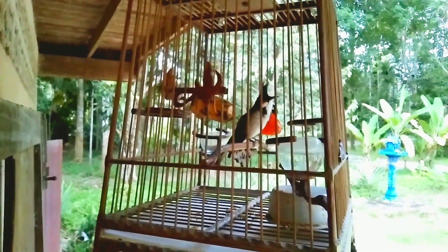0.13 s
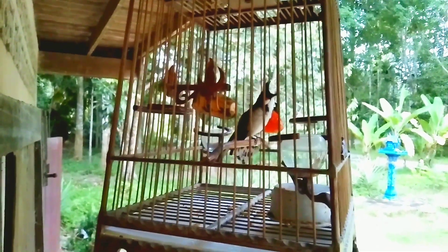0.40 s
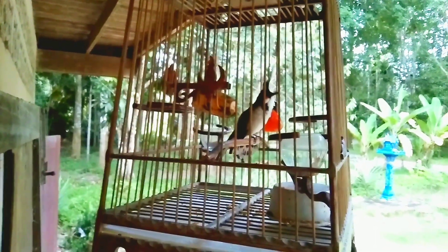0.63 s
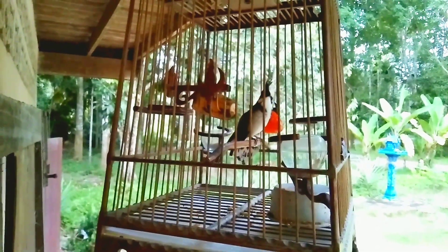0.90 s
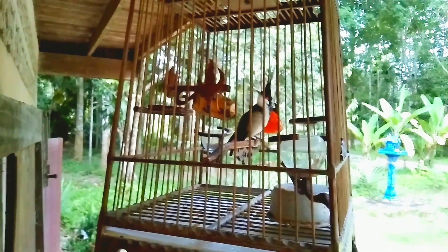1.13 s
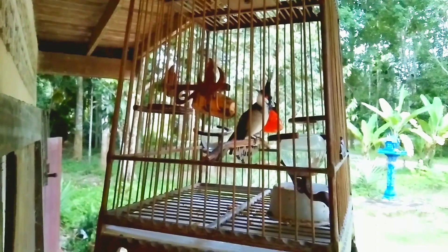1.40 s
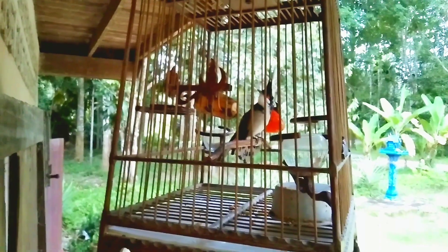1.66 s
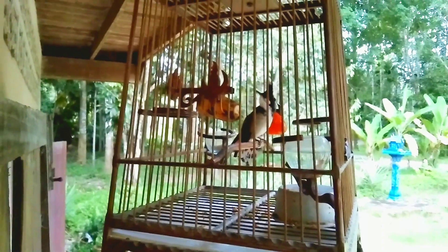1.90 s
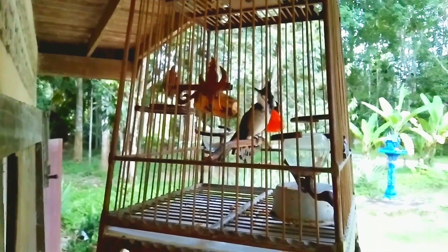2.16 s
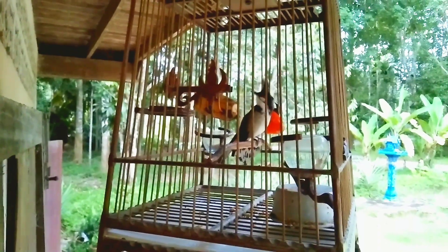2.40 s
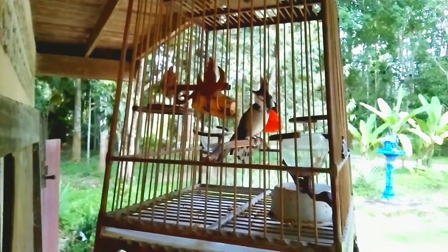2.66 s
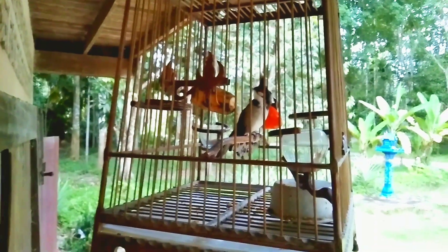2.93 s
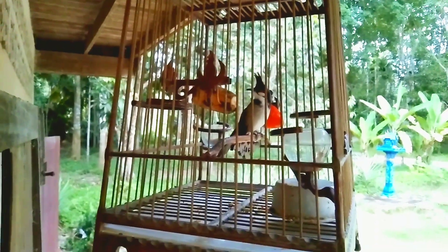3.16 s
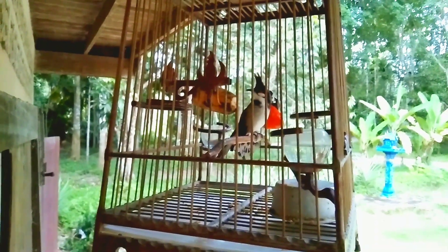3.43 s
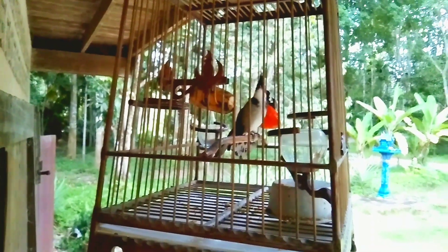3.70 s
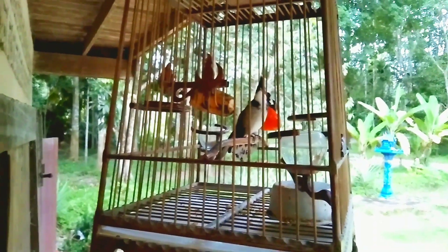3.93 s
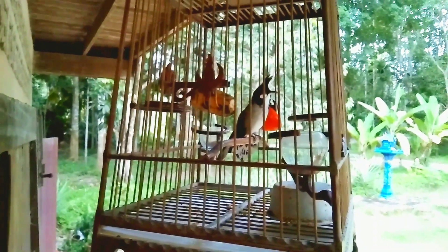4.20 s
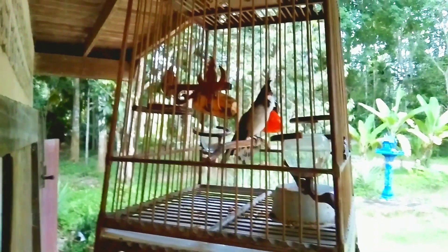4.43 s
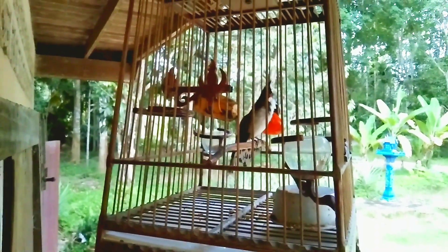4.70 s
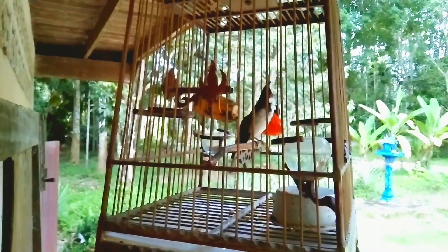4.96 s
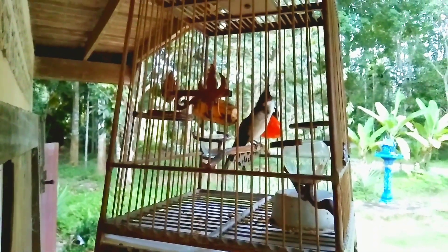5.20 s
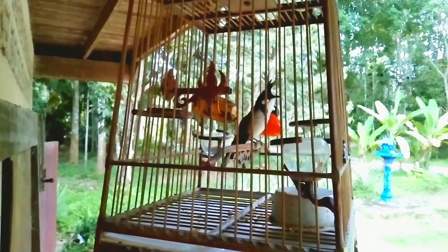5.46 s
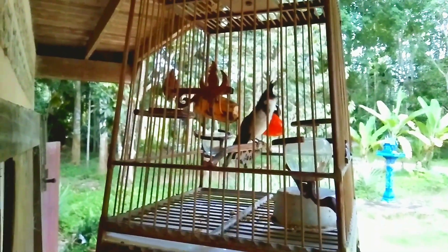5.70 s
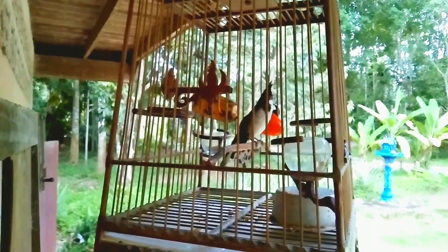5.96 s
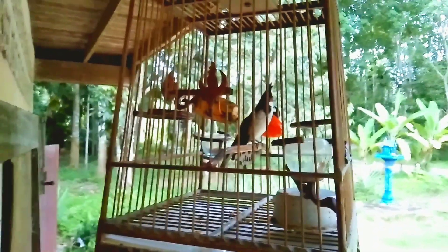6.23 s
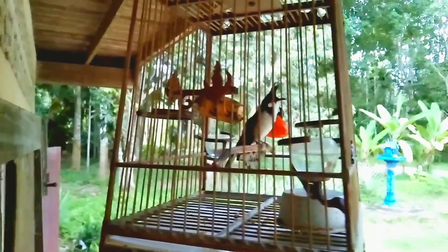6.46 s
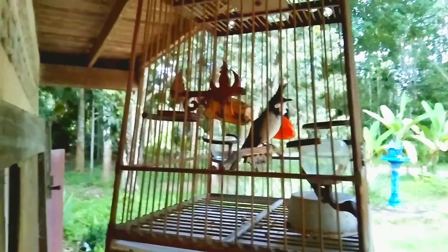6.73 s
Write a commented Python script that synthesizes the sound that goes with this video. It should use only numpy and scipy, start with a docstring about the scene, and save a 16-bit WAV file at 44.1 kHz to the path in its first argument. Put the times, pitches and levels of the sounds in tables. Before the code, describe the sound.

Outdoors beside a wooden-roofed porch, a brief echoing tail of birdsong fades into faint twitters among trees, soft throbbing dove coos, thin insect buzzes and light garden hiss. Past the middle, a caged bulbul close to the microphone bursts into a loud, quick phrase of liquid gliding whistles lasting about a second. Its echo rings in the trees, then the quiet background returns.

```python
"""Bulbuls under a roof and among trees

One bulbul under a wooden roof whistles a loud bubbly phrase close by: gliding tones, overtones, early echoes.
Gliding tones among the trees, from other bulbuls and high chirps, are heard mostly through noise-built echo.
Doves coo in throbbing low tones; insects buzz in swells of narrow noise beaten by wing strokes.
Shaped noise makes a low rumble, a faint rustle and steady air; very faint low tones make a patchy floor."""
import sys
import numpy as np
from scipy import signal
from scipy.fft import rfft, irfft, next_fast_len
from scipy.io import wavfile
from scipy.ndimage import uniform_filter1d, map_coordinates

SR = 44100
rng = np.random.default_rng(int(sys.argv[2]) if len(sys.argv) > 2 else 0)


def log_audio(samples):
    """Write samples as a 16-bit WAV file to the path given in sys.argv[1]."""
    # one column per channel
    frames = np.atleast_2d(samples).T
    # limit to full scale, then quantise
    limited = np.clip(frames, -1, 1)
    pcm = np.round(limited * 32767).astype(np.int16)
    wavfile.write(sys.argv[1], SR, pcm)


def boost(x):
    """Linear amplitude factor 10**(x/20) for a level x in decibels (scalar or array-like)."""
    u = np.asarray(x, float) / 20
    return 10 ** u


N = 302085
LEAD = SR // 4  # samples a track starts early


def unit(x):
    """Scaled to rms 1."""
    return x / np.sqrt(np.mean(x ** 2) + 1e-20)


def along(points, hz):
    """(frequency [Hz], value) points read on a log frequency axis."""
    f, v = np.transpose(points)
    return np.interp(np.log(hz + 1), np.log(f + 1), v)


def wobble(rate_hz, size=N):
    """A smooth random curve, rate_hz knots a second."""
    knots = rng.standard_normal(int(size * rate_hz / SR) + 4)
    return map_coordinates(knots, [np.arange(size) * rate_hz / SR])


def noise(gain_db):
    """Noise of rms 1 coloured by a dB function of frequency."""
    m = next_fast_len(N)
    spectrum = rfft(rng.standard_normal(m)) * boost(gain_db(np.fft.rfftfreq(m, 1 / SR)))
    return unit(irfft(spectrum, m)[:N])


def resonance(centre_hz, width_hz):
    """Noise of rms 1 in one narrow band."""
    return noise(lambda hz: np.maximum(-4 * ((hz - centre_hz) / width_hz) ** 2, -120))


def since(s):
    """Seconds after each given moment, a row for each."""
    return np.arange(N) / SR - np.asarray(s)[:, None]


def add(track, s, sound):
    """Mixes a sound into a track that starts LEAD samples early."""
    part = track[round(s * SR) + LEAD:][:len(sound)]
    part += sound[:len(part)]


# echo among the trunks: (frequency [Hz], t60 [s])
TREE_T60 = [(600, 0.33), (2000, 0.53), (4000, 0.36), (9000, 0.29)]


def echo(rise_s, patchy_db=1.0):
    """A fresh tail of energy 1; each frequency dies at its own speed, in clumps, as trunks stand unevenly."""
    hz, t, z = signal.stft(rng.standard_normal(SR * 3 // 5), SR, nperseg=256)
    clumps = uniform_filter1d(rng.standard_normal(z.shape), size=5, axis=0)
    clumps = unit(uniform_filter1d(clumps, size=3, axis=1))
    decay_db = -60 * t / along(TREE_T60, hz)[:, None]
    build = 1 - np.exp(-t / rise_s)
    tail = signal.istft(z * boost(patchy_db * clumps + decay_db) * build, SR, nperseg=256)[1]
    return tail / np.linalg.norm(tail)


# air rushing through a throat: (frequency [Hz], relative density [dB])
BREATH_COLOUR = [(4000, -64.5), (5000, -9), (7500, 1), (9000, -4.5), (12000, -20), (15500, -31.5)]


def breath(size):
    """A short stretch of throat noise of rms 1."""
    gain = boost(along(BREATH_COLOUR, np.fft.rfftfreq(size, 1 / SR)))
    return unit(irfft(rfft(rng.standard_normal(size)) * gain, size))


# loud bass at the start, soon falling; then low thumps: (time [s], peak level [dB])
BASS_PEAKS = [(.02, -45.5), (.2, -49), (.61, -59.5), (1.03, -60.5), (1.35, -56), (1.56, -56), (2.02, -63),
              (2.22, -63), (2.63, -58.5), (2.92, -55), (3.199, -65.5), (3.5, -65), (3.83, -60.5),
              (4.2, -59), (5.45, -68), (5.98, -65), (6.319, -59)]
# rumble colour: (frequency [Hz], relative density [dB])
RUMBLE_COLOUR = [(12, -57.5), (20, -17.5), (32, -24), (75, -5.5), (118, -4.5), (137, -7), (178, -16.5),
                 (220, -27), (290, -58), (480, -120)]
STEADY_DB, PEAK_RISE_DB_PER_S, PEAK_FALL_DB_PER_S = -74, 199.5, 101


def rumble():
    """Lumpy low noise with a wavering narrow hum; bass peaks rise above a steady floor."""
    s, db = np.transpose(BASS_PEAKS)
    t = since(s)
    peaks_db = db[:, None] - np.maximum(-PEAK_RISE_DB_PER_S * t, PEAK_FALL_DB_PER_S * t)
    level_db = uniform_filter1d(np.maximum(peaks_db.max(axis=0), STEADY_DB), size=1500)
    hum = resonance(centre_hz=127, width_hz=6)
    body = noise(lambda hz: along(RUMBLE_COLOUR, hz)) + 0.44 * hum
    return boost(level_db) * unit(boost(0.77 * wobble(34)) * body)


# rustle colour: (frequency [Hz], relative density [dB])
RUSTLE_COLOUR = [(170, -30), (250, 9), (480, 2.5), (1000, -8.5), (1500, -36)]
# rustle loudness: (time [s], level [dB])
RUSTLE_LEVEL = [(0, -89), (.21, -80), (.4, -91), (1.05, -88), (2.6, -84.5), (3.34, -87.5), (3.7, -79),
                (4.2, -71), (4.37, -84), (6.2, -76), (6.35, -72), (6.85, -66.5)]


def rustle():
    """Faint flickering noise that comes and goes."""
    s, db = np.transpose(RUSTLE_LEVEL)
    flicker = boost(4.7 * wobble(25))
    return boost(np.interp(np.arange(N) / SR, s, db)) * unit(flicker * noise(lambda hz: along(RUSTLE_COLOUR, hz)))


# garden hiss with a far insect chorus near 4.6 kHz: (frequency [Hz], relative density [dB])
AIR_COLOUR = [(500, -32), (800, -2.5), (1200, -16.5), (1900, -8.5), (2400, -23), (3900, -19), (4300, -6.5),
              (4650, -3.5), (5000, -8.5), (5500, -22), (6000, -20), (9000, -25), (15400, -31),
              (16200, -56.5)]
AIR_DB = -80.5


def air():
    """Coloured noise, almost steady."""
    return boost(AIR_DB + 0.68 * wobble(4.2)) * noise(lambda hz: along(AIR_COLOUR, hz))


# overtones of a bird among the nearest trees: (multiple of the pitch, level [dB])
NEAR_TREE_OVERTONES = [(2, -29), (3, -33.5), (4, -58.5)]


def far_whistles(notes, direct_db=-10, dulling=0.97, bend=0.87, waver=.02, breath_db=-42):
    """Distant whistles arrive weak and direct, then mostly as echo from the trees."""
    track = np.zeros(N + LEAD)
    for s, length_s, start_hz, end_hz, db in notes:
        u = np.linspace(0, 1, round(length_s * SR))
        glide_hz = start_hz + (end_hz - start_hz) * u ** bend
        phase = 2 * np.pi * np.cumsum(glide_hz * (1 + waver * wobble(119.3, size=len(u)))) / SR
        loss_db = dulling * min(db + 26.0, 0)  # fainter means farther: air and leaves eat the overtones
        level = np.sqrt(2) * boost(db) * np.sin(np.pi * u)
        fundamental = np.sin(phase)
        overtones = sum(boost(k_db + loss_db) * np.sin(round(k) * phase) for k, k_db in NEAR_TREE_OVERTONES)
        throat = boost(breath_db + loss_db) * breath(len(u))
        # turned away: only the fundamental comes straight
        add(track, s, boost(direct_db) * level * fundamental)
        add(track, s, signal.fftconvolve(level * (fundamental + overtones + throat), echo(rise_s=0.0089)))
    return track[LEAD:]


# clearest gliding whistles among the trees, with the echo wash under the near phrase:
# (time [s], length [s], start pitch [Hz], end pitch [Hz], level into the echo [dB])
TREE_NOTES = [(-0.039, 0.022, 4210, 4035, -21), (-0.027, 0.043, 4140, 2903, -34),
              (-0.03, 0.035, 3100, 2033, -41.5), (-0.018, 0.022, 3730, 3734, -29),
              (0.11, 0.032, 3180, 4090, -41.5), (0.129, 0.011, 2630, 3240, -30.5),
              (0.108, 0.034, 1970, 2276, -42.5), (0.143, 0.03, 2046, 2905, -29.5),
              (0.201, 0.029, 2030, 2440, -31.5), (0.25, 0.016, 1120, 1030, -66),
              (0.4, 0.036, 1050, 1032, -67.5), (0.535, 0.018, 2740, 2080, -57.5),
              (0.548, 0.033, 2476, 4030, -48.5), (0.578, 0.019, 3690, 3540, -45),
              (0.685, 0.025, 2530, 2440, -65), (0.7, 0.024, 1600, 1540, -74),
              (0.709, 0.037, 2790, 2852, -49), (0.77, 0.032, 3110, 3340, -62.5),
              (0.793, 0.069, 3210, 2545, -55), (1.28, 0.041, 2880, 3120, -60),
              (1.3, 0.022, 1715, 3120, -53.5), (1.318, 0.02, 2900, 3800, -45),
              (1.345, 0.025, 4050, 3583, -43), (1.411, 0.081, 1830, 1910, -68),
              (1.553, 0.015, 1720, 2560, -46), (1.581, 0.012, 2670, 3125, -38.5),
              (1.675, 0.017, 2260, 2065, -47), (1.685, 0.018, 3030, 3720, -39.5),
              (1.795, 0.022, 2630, 3240, -42), (1.825, 0.019, 3260, 3800, -39.5),
              (1.806, 0.043, 3170, 3120, -48), (1.858, 0.042, 1470, 1398, -53),
              (1.89, 0.029, 2470, 2405, -44.5), (1.951, 0.037, 2390, 1396, -47.5),
              (2.02, 0.0086, 3260, 2480, -47.5), (2.074, 0.038, 1870, 3330, -52),
              (2.087, 0.028, 2120, 1883, -49.5), (2.124, 0.044, 3540, 2935, -47),
              (2.21, 0.014, 1220, 1230, -58.5), (2.26, 0.062, 2490, 2454, -44.5),
              (2.281, 0.011, 2850, 2010, -42.5), (2.35, 0.023, 2910, 2854, -42),
              (2.39, 0.03, 2900, 3690, -44), (2.471, 0.052, 1680, 1920, -53),
              (2.5, 0.02, 2100, 2210, -38.5), (2.536, 0.038, 3200, 2120, -46.5),
              (2.669, 0.019, 2150, 3390, -41), (2.696, 0.044, 1310, 1660, -63.5),
              (2.807, 0.042, 2310, 2270, -45), (2.815, 0.036, 2460, 3660, -48),
              (2.894, 0.0085, 2810, 2880, -45), (2.955, 0.029, 1790, 1887, -53),
              (3.009, 0.014, 3670, 3340, -56), (3.2, 0.06, 785, 1006, -67),
              (3.265, 0.055, 2100, 2264, -58.5), (3.33, 0.031, 2550, 2680, -51),
              (3.36, 0.013, 2767, 2516, -39), (3.39, 0.027, 2800, 3880, -59),
              (3.39, 0.053, 2340, 1230, -63), (3.475, 0.016, 3500, 2640, -53),
              (3.501, 0.072, 1390, 1182, -58.5), (3.526, 0.02, 2130, 1980, -55.5),
              (3.698, 0.025, 1640, 1740, -64.5), (3.72, 0.024, 1060, 1070, -63),
              (3.725, 0.079, 1190, 1331, -58.5), (3.732, 0.044, 2070, 3090, -48),
              (3.785, 0.021, 2910, 3290, -47.5), (3.849, 0.015, 1270, 1234, -54.5),
              (3.87, 0.026, 2150, 2133, -48), (3.934, 0.051, 1310, 1184, -61.5),
              (3.953, 0.042, 2820, 1750, -55.5), (4.02, 0.036, 1740, 1500, -65.5),
              (4.04, 0.028, 3130, 4000, -65.5), (4.28, 0.031, 1280, 1410, -68),
              (4.374, 0.012, 2300, 4210, -33.5), (4.385, 0.03, 3620, 4180, -31),
              (4.41, 0.03, 4100, 4290, -28.5), (4.53, 0.05, 3140, 3110, -37.5),
              (4.6, 0.034, 2220, 2090, -45), (4.549, 0.063, 2910, 1910, -31.5),
              (4.7, 0.053, 2016, 4250, -34), (4.77, 0.071, 4060, 2980, -24.5),
              (4.86, 0.033, 1870, 3400, -36.5), (4.87, 0.035, 3520, 3720, -29),
              (4.95, 0.073, 4128, 2292, -24.5), (5.03, 0.061, 1987, 3812, -27),
              (5.1, 0.041, 2800, 2650, -24.5), (5.06, 0.016, 1300, 1650, -53),
              (5.18, 0.017, 1790, 1840, -50.5), (5.25, 0.069, 1515, 1315, -63.5),
              (5.292, 0.021, 2600, 3340, -27.5), (5.317, 0.027, 4290, 2470, -26),
              (5.438, 0.015, 3770, 3230, -26.5), (5.471, 0.0088, 3780, 3580, -32),
              (5.478, 0.033, 2470, 3246, -22.5), (5.506, 0.013, 2380, 2615, -20.5),
              (5.45, 0.052, 1420, 1342, -69.5), (5.55, 0.027, 1720, 1605, -55.5),
              (5.595, 0.016, 2600, 2664, -24), (5.629, 0.051, 3280, 4170, -43.5),
              (5.66, 0.04, 3600, 3883, -43), (5.717, 0.055, 4300, 4100, -49),
              (5.78, 0.0058, 1477, 1720, -55), (5.798, 0.013, 3200, 1970, -47.5),
              (5.828, 0.012, 3630, 3640, -34.5), (5.84, 0.055, 2016, 1690, -63),
              (5.866, 0.029, 3110, 2940, -57), (6.05, 0.02, 1590, 1536, -68),
              (6.125, 0.046, 2880, 2780, -46.5), (6.163, 0.044, 2760, 1830, -53.5),
              (6.189, 0.012, 3400, 2770, -46.5), (6.244, 0.0096, 2020, 2005, -43.5),
              (6.327, 0.032, 2630, 3780, -44.5), (6.371, 0.057, 2250, 2940, -49),
              (6.454, 0.045, 2920, 3364, -43), (6.572, 0.037, 2750, 3380, -45),
              (6.6, 0.089, 2300, 1574, -54), (6.626, 0.028, 3660, 3040, -49),
              (6.65, 0.034, 3590, 3980, -57), (6.716, 0.067, 1500, 1240, -58),
              (6.724, 0.066, 3500, 3314, -45.5), (6.812, 0.046, 2160, 2930, -52.5)]


def tree_whistles():
    """Single gliding whistles, nearer and farther, and the wash under the near phrase."""
    return far_whistles(TREE_NOTES)


# spells of soft notes: (start [s], end [s], lowest pitch [Hz], highest pitch [Hz], level into the echo [dB])
TWITTER_SPELLS = [(-.1, .1, 1983, 3600, -53.5), (1.3, 1.38, 1905, 3900, -60), (1.95, 2.2, 1297, 2300, -66),
                  (2.33, 2.78, 690, 1700, -76), (1.779, 2.15, 1885, 3808, -54.5),
                  (2.296, 3.0, 1863, 3610, -57), (3.482, 3.68, 2154, 2840, -65.5),
                  (3.805, 4.027, 1797, 3276, -61.5), (4.72, 5.1, 1988, 4200, -43.5),
                  (5.28, 5.55, 2607, 4300, -38.5), (5.69, 5.869, 2445, 3917, -52),
                  (6.333, 6.78, 2121, 3750, -56.5)]
TWITTER_PER_S, TWITTER_S = 22, 0.077  # note rate, note length


def twitter():
    """Evenly paced notes, each gliding between two random pitches of its spell's range."""
    notes = []
    for start, end, low_hz, high_hz, db in TWITTER_SPELLS:
        s = np.arange(start, end, 1 / TWITTER_PER_S)
        ends_hz = low_hz + (high_hz - low_hz) * rng.random((len(s), 2))
        notes += [(when, TWITTER_S, *pair, db) for when, pair in zip(s, ends_hz)]
    return far_whistles(notes)


def patchy_floor(count=110, low_hz=450, high_hz=2200, level_db=-79, spread_db=4):
    """Very faint short low tones at random moments, a patchy floor."""
    when, pitch, glide, size = rng.random((count, 4)).T
    length_s = .02 + .03 * size
    hz = low_hz * (high_hz / low_hz) ** pitch
    end_hz = hz * (1 + .2 * (glide - .5))
    db = level_db + spread_db * (2 * size - 1)
    return far_whistles(np.transpose([when * N / SR, length_s, hz, end_hz, db]))


# dove coos: (time [s], length [s], pitch reached after the opening scoop [Hz], end pitch [Hz], level [dB])
DOVE_COOS = [(-.1, .33, 740, 617.5, -51), (.3, .34, 700, 620, -61.5), (.72, .1, 800, 770, -86),
             (1.079, .1, 714, 700, -81), (1.3, .04, 690, 671.2, -73), (1.41, .05, 600, 610, -64.5),
             (1.63, .11, 640, 600, -66.5), (1.86, .4, 720, 623, -63), (2.329, .2, 815, 840, -78.5),
             (2.6, .13, 750, 694, -73), (2.87, .12, 680, 708, -52), (2.99, .14, 705, 700, -66.5),
             (3.16, .46, 715, 650.6, -52.5), (3.63, .22, 645, 626, -63), (4.03, .32, 730, 607.4, -60),
             (4.79, .15, 680, 690, -61), (4.973, .3, 709, 700, -75), (5.331, .15, 642, 718.5, -76.5),
             (5.6, .13, 630, 600, -66), (5.9, .31, 700, 594, -61), (6.29, .1, 715, 684.6, -49),
             (6.39, .15, 720, 690, -64), (6.58, .4, 700, 716, -54.5)]
SCOOP, SCOOP_SHARE = 0.94, 0.19  # start pitch over pitch after the scoop, share of the length spent climbing
COO_RISE_S, COO_FALL_S, COO_SAG_DB = 0.043, 0.1, 5.5


def doves(throb_hz=45, depth=1.0, wet=2.2):
    """A soft low tone that throbs in the throat, blurred by distance; each coo opens quickly and sags."""
    s, length, scooped_hz, end_hz, db = np.transpose(DOVE_COOS)
    knots_s = np.ravel([s, s + SCOOP_SHARE * length, s + length], "F")
    knots_hz = np.ravel([SCOOP * scooped_hz, scooped_hz, end_hz], "F")
    pitch = np.interp(np.arange(N) / SR, knots_s, knots_hz)
    t, length = since(s), length[:, None]
    gate = np.clip(np.minimum(t / COO_RISE_S, 1 + (length - t) / COO_FALL_S), 0, 1) ** 2
    sag_db = COO_SAG_DB * np.clip(t / length, 0, 1)
    level = np.max(gate * boost(db[:, None] - sag_db), axis=0)
    throb = 1 + depth * np.sin(2 * np.pi * np.cumsum(throb_hz * (1 + 0.4 * wobble(6))) / SR)
    phase = 2 * np.pi * np.cumsum(pitch * (1 + 0.025 * wobble(37))) / SR
    tone = unit(throb * np.sin(phase))
    blur = unit(signal.fftconvolve(tone, echo(rise_s=0.006)[:SR // 8])[:N])
    return level * unit(tone + wet * blur)


SWELL_DB, START_DB_PER_S, STOP_DB_PER_S = 10, 140, 255.5  # gain within a swell, slopes before and after it


def buzz(rows, centre_hz, width_hz, beat_hz):
    """Short wing strokes beat a narrow resonance; the insect swells to a peak, then stops."""
    s, db, swell = np.transpose(rows)
    t, swell = since(s), swell[:, None]
    under_db = SWELL_DB * np.clip(-t / swell, 0, 1)
    under_db = under_db + START_DB_PER_S * np.maximum(-t - swell, 0) + STOP_DB_PER_S * np.maximum(t, 0)
    strokes = 1 + .7 * np.sin(2 * np.pi * beat_hz * np.arange(N) / SR + 2 * wobble(20))
    level = boost(np.max(db[:, None] - under_db, axis=0))
    return level * unit(resonance(centre_hz, width_hz) * strokes)


# swells of three buzzes, each: (peak time [s], peak level [dB], swell length [s])
HIGH_SWELLS = [(0.02, -89, .1), (.66, -69.5, .5), (1.5, -71, 0.17), (2.44, -72, 0.19), (3.35, -71.5, 0.27),
               (4.25, -69.5, 0.13), (5.2, -76.5, .25), (6.1, -71, .2), (6.86, -73.5, 0.17)]
LOW_SWELLS = [(0.02, -70, .1), (.74, -65.5, 0.45), (1.64, -65, 0.3)]
THIN_SWELLS = [(.6, -83, .6), (1.8, -82.5, 0.89), (2.37, -73, .05), (2.9, -82, .3), (4.3, -83.5, 0.7),
               (6.75, -80.5, 0.42)]


def insects():
    """Three buzzes at different pitches; two beat near 200 Hz, the thin one near 85 Hz."""
    high = buzz(HIGH_SWELLS, centre_hz=8420, width_hz=170, beat_hz=200)
    low = buzz(LOW_SWELLS, centre_hz=7890, width_hz=155, beat_hz=199.3)
    thin = buzz(THIN_SWELLS, centre_hz=7390, width_hz=98, beat_hz=85.5)
    return high + low + thin


# short high chirps, and at 5.78 s the bright overtone sweep of a whistle:
# (time [s], length [s], start pitch [Hz], end pitch [Hz], level into the echo [dB])
HIGH_NOTES = [(.1, 0.12, 9300, 9260, -75.5), (.24, 0.14, 9500, 9200, -73), (.17, .04, 5870, 5730, -79),
              (.93, .04, 6400, 5960, -75.5), (1.1, 0.036, 5550, 5270, -76.5),
              (1.27, 0.049, 5600, 5280, -69.5), (1.45, 0.097, 5500, 5360, -74),
              (1.84, 0.026, 7430, 6060, -62.5), (2.34, 0.027, 7400, 7600, -70),
              (3.57, 0.0137, 6820, 5800, -54.5), (3.91, .04, 6300, 6170, -77),
              (5.78, 0.029, 4820, 9080, -52.5), (5.81, 0.029, 5750, 5270, -53.5),
              (6.66, 0.051, 5490, 5300, -74)]


def high_notes():
    """High chirps and one overtone sweep, heard mostly through the tree echo."""
    return far_whistles(HIGH_NOTES)


# near bulbul, one list a note: (time [s], pitch [Hz], level [dB])
SONG_NOTES = [
    [(4.446, 1800, -50), (4.455, 2150, -28), (4.463, 2800, -20), (4.474, 3000, -15), (4.479, 3100, -25),
     (4.484, 3230, -13), (4.495, 3500, -14), (4.503, 3560, -19), (4.51, 3560, -45)],
    [(4.7, 3700, -36), (4.703, 3200, -18), (4.707, 3100, -30), (4.713, 3330, -11), (4.718, 3000, -30)],
    [(4.713, 2670, -36), (4.722, 2670, -17), (4.745, 2692, -15.5), (4.765, 2690, -15.5), (4.79, 2635, -16),
     (4.8, 2620, -21), (4.808, 2550, -40)],
    [(4.807, 2800, -40), (4.813, 3420, -10), (4.817, 3510, -22), (4.823, 3670, -13), (4.832, 3800, -13.5),
     (4.841, 3850, -23), (4.852, 3900, -40)],
    [(4.9, 1500, -46), (4.913, 2050, -25), (4.921, 2100, -22), (4.925, 2450, -19), (4.93, 2460, -16),
     (4.935, 2480, -36)],
    [(4.928, 2900, -40), (4.936, 3270, -15), (4.946, 3310, -13), (4.953, 3480, -18), (4.96, 3240, -15),
     (4.978, 3200, -13), (4.986, 3180, -18), (4.993, 3150, -40)],
    [(4.997, 1700, -42), (5.006, 2400, -24), (5.012, 2700, -20), (5.022, 2690, -16), (5.031, 2680, -21),
     (5.037, 2650, -40)],
    [(5.024, 2350, -40), (5.035, 2230, -18), (5.048, 2270, -15), (5.057, 2270, -21), (5.066, 2200, -40)],
]
# beak opening, one value a note: gain per overtone step [dB]
BEAK_GAPE = [-3, 4, 1.05, 2.5, 0, -0.5, -3, -1]
# throat and beak colour for overtones: (frequency [Hz], level re fundamental before gape [dB])
BEAK_COLOUR = [(4400, -27.5), (5400, -21.5), (6500, -30), (8000, -24), (9300, -37.5), (10800, -28),
               (11500, -37.5), (13000, -54.5), (16000, -81), (17000, -120)]
# early roof echoes: (delay [s], level [dB])
ROOF_ECHOES = [(.0021, -17), (.0047, -19), (.0083, -20), (.013, -21), (.019, -22), (.027, -23)]


def near_bulbul(echo_db=-15, echo_shine_db=-6, breath_db=-42, half_db=-42):
    """Each note is a gliding whistle with weak overtones, answered by the roof and then by the trees."""
    track = np.zeros(N + LEAD)
    roof = np.zeros(SR // 30)
    roof[0] = 1
    for s, db in ROOF_ECHOES:
        roof[round(s * SR)] = boost(db)
    muscle = np.hanning(round(.0025 * SR))
    muscle = muscle / muscle.sum()
    for note, gape_db in zip(SONG_NOTES, BEAK_GAPE):
        s, hz, db = np.transpose(note)
        t = np.arange(s[0], s[-1], 1 / SR)
        size = len(t)
        glide_hz = np.interp(t, s, hz)
        pitch = glide_hz * (1 + .005 * wobble(200, size))
        phase = 2 * np.pi * np.cumsum(pitch) / SR
        level = np.sqrt(2) * boost(np.interp(t, s, db) + .8 * wobble(150, size))  # slight flutter
        # muscles cannot jump
        level = np.convolve(level * signal.windows.tukey(size, .2), muscle, "same")
        shine = 0
        for k in (2, 3, 4, 5):
            shine = shine + boost(along(BEAK_COLOUR, k * pitch) + gape_db * (k - 1)) * np.sin(k * phase)
        shine = shine * np.sqrt(level / level.max())  # harder blowing is brighter
        throat = boost(breath_db) * breath(size)
        # fast glides are hoarse
        rough = np.clip(np.abs(np.gradient(glide_hz)) * SR / 25000, .12, 1)
        rough = np.convolve(rough, muscle, "same")
        level = level * (1 + .4 * rough * wobble(400, size))
        shine = shine * (1 - .6 * rough + .9 * rough * wobble(1500, size))
        # on held notes strong and weak cycles alternate slightly
        uneven = 1 + boost(half_db) * (1 - rough) ** 2 * np.sin(phase / 2)
        direct = level * uneven * (np.sin(phase) + shine + throat)
        add(track, s[0], signal.fftconvolve(direct, roof))
        # the beak beams its treble forward, so the trees get less
        dull = level * (np.sin(phase) + boost(echo_shine_db) * shine + throat)
        add(track, s[0], boost(echo_db) * signal.fftconvolve(dull, echo(rise_s=.015)))
    return track[LEAD:]


def scene():
    """Everything at one microphone."""
    garden = rumble() + rustle() + air()
    far = tree_whistles() + twitter() + patchy_floor() + high_notes()
    return (garden + far + doves() + insects() + near_bulbul())[None]


def roll_off(x):
    """The treble ends steeply here."""
    return signal.sosfilt(signal.butter(12, 15480, fs=SR, output="sos"), x)


def record(dry):
    """The finished mix as it is stored."""
    return roll_off(dry)


dry = scene()
out = record(dry)
log_audio(out)
```